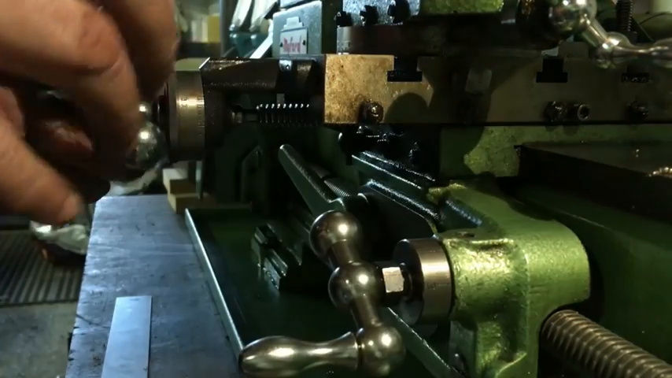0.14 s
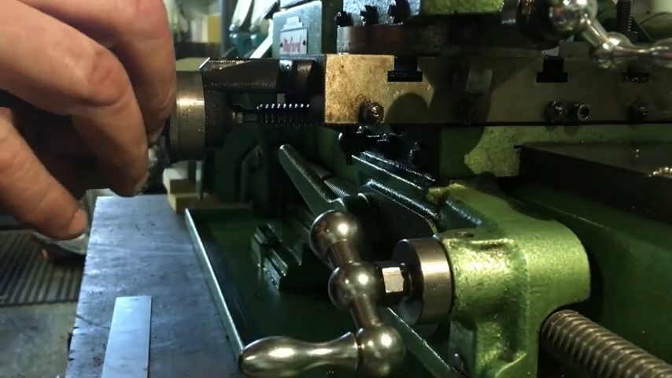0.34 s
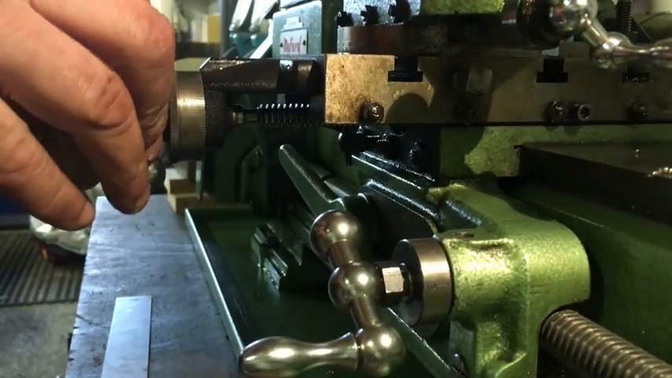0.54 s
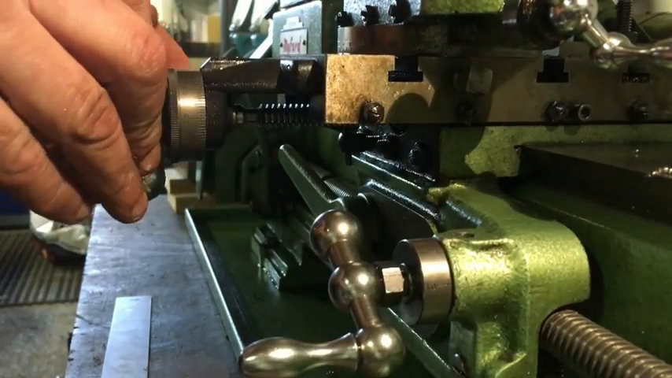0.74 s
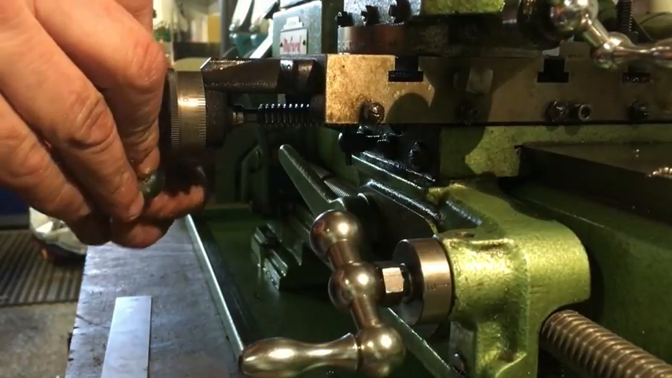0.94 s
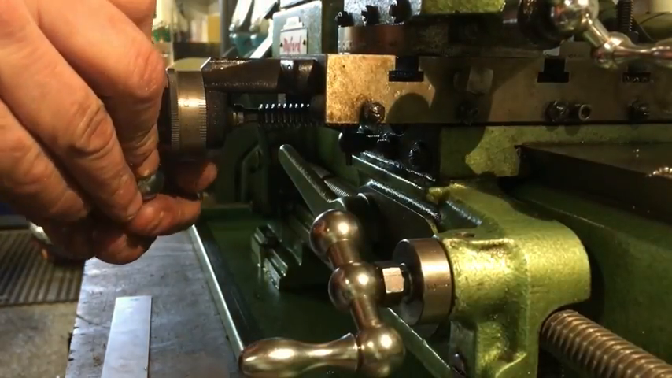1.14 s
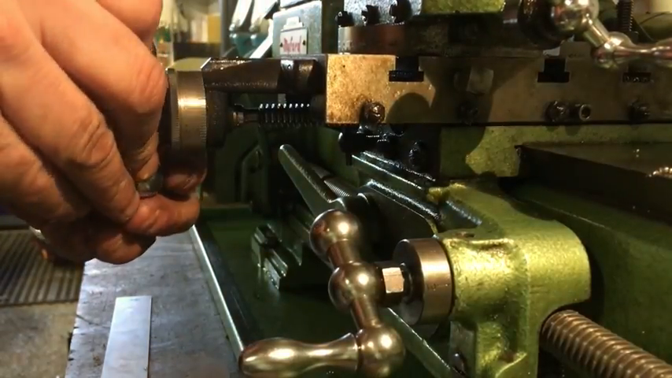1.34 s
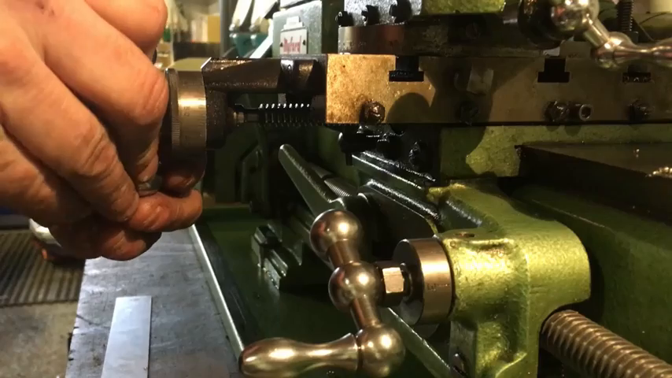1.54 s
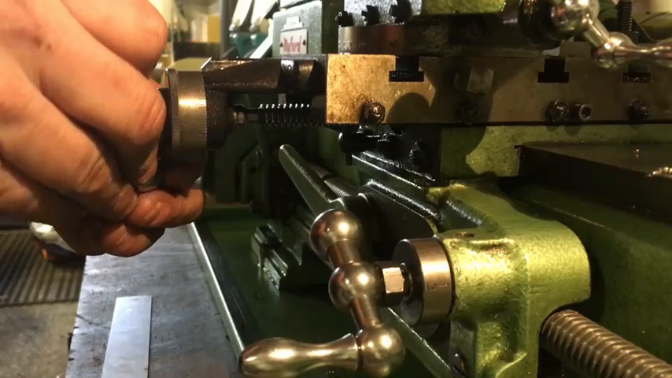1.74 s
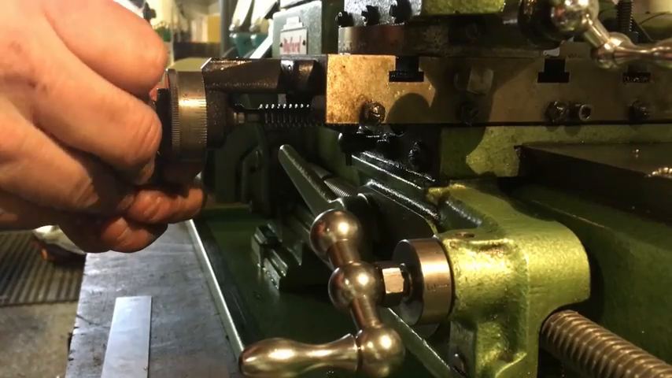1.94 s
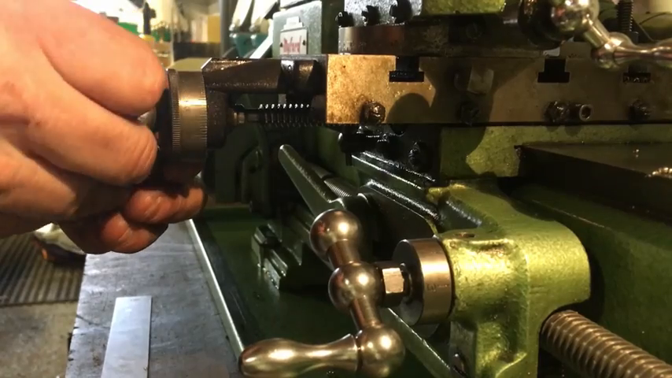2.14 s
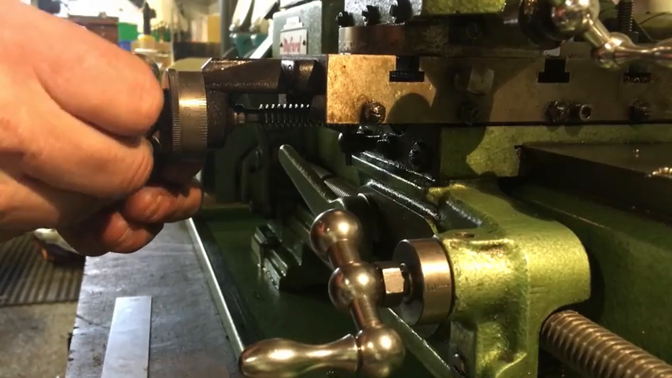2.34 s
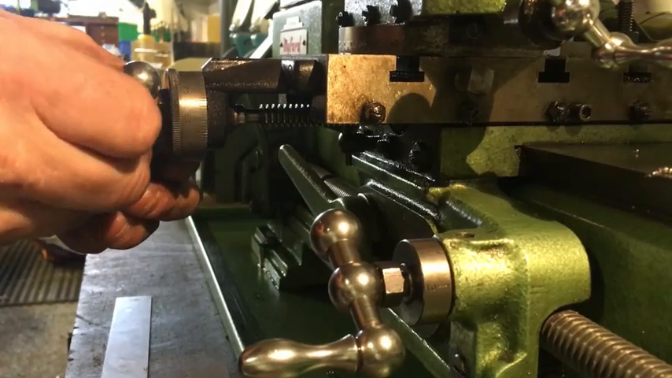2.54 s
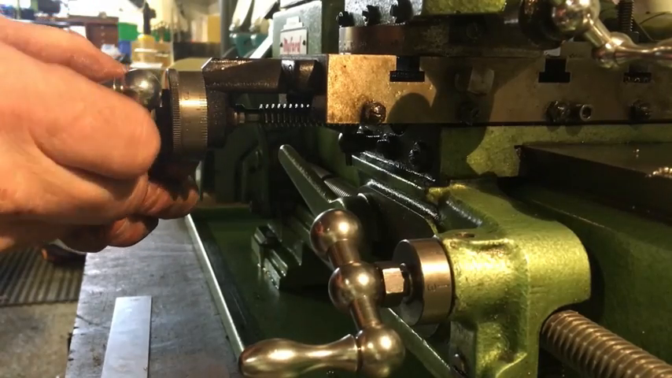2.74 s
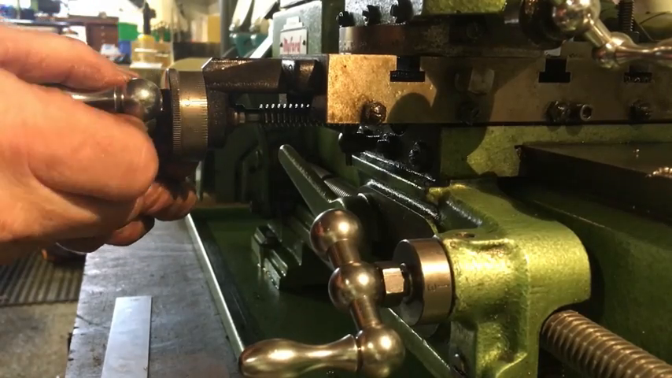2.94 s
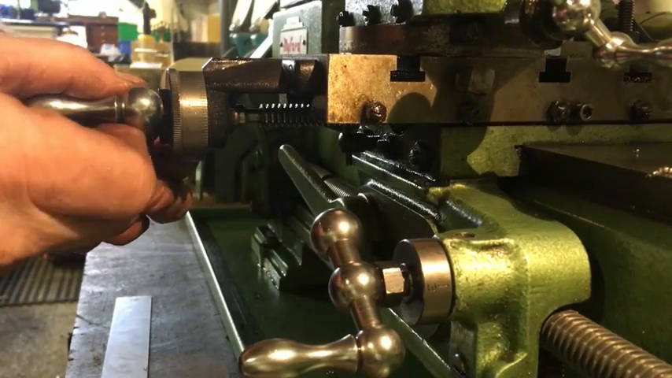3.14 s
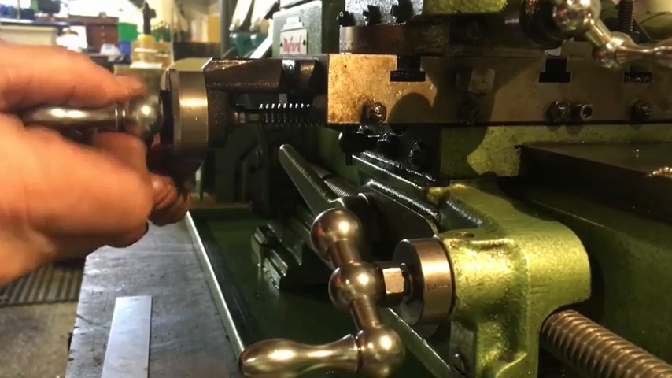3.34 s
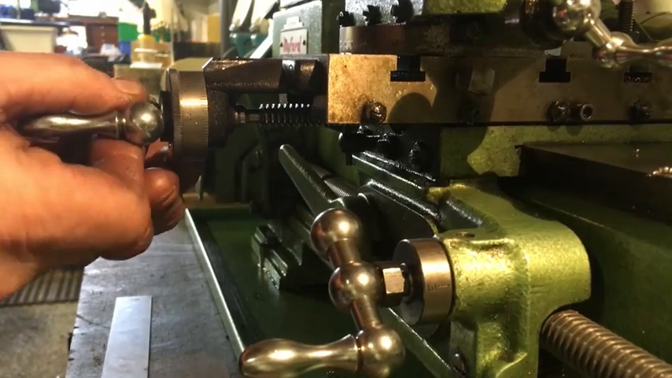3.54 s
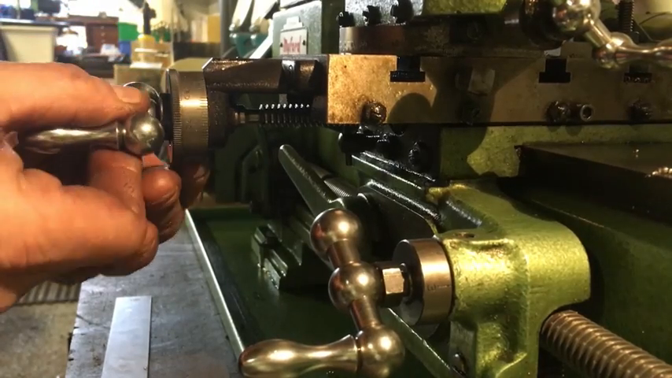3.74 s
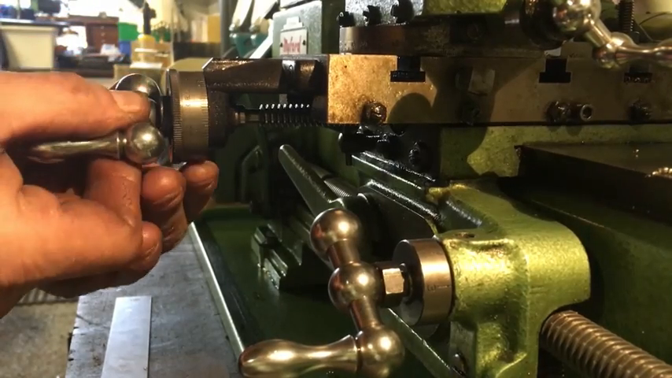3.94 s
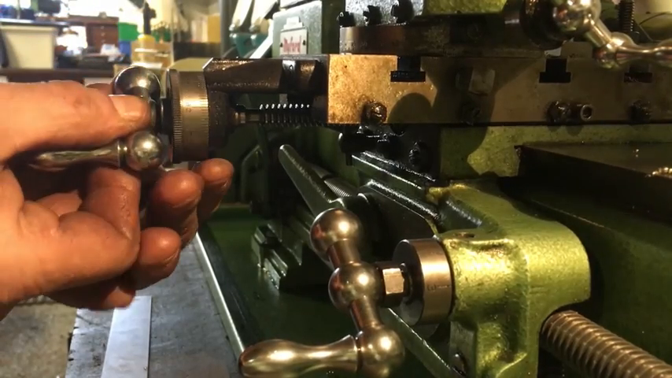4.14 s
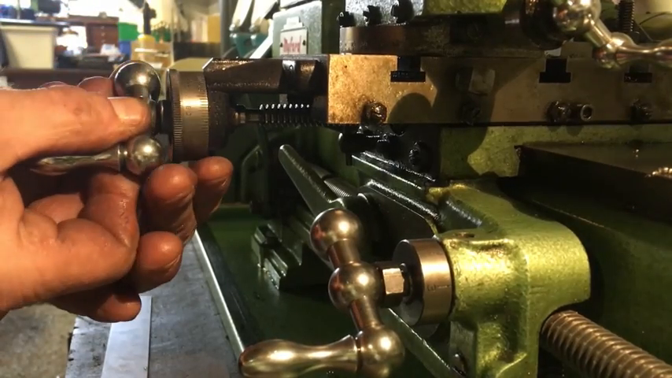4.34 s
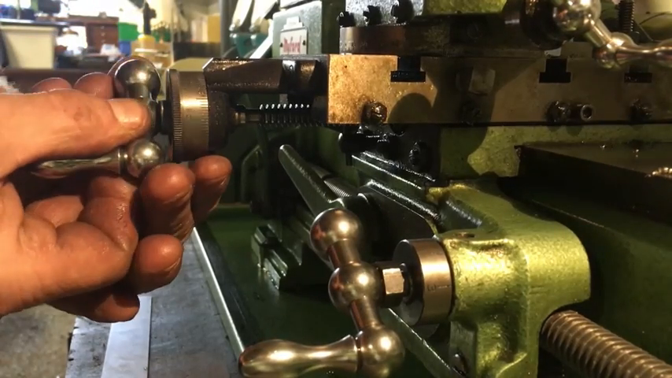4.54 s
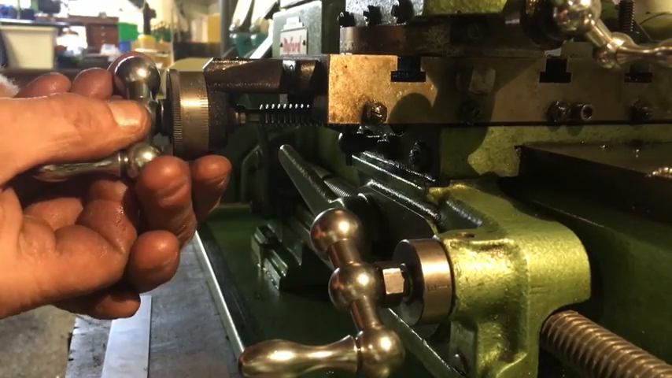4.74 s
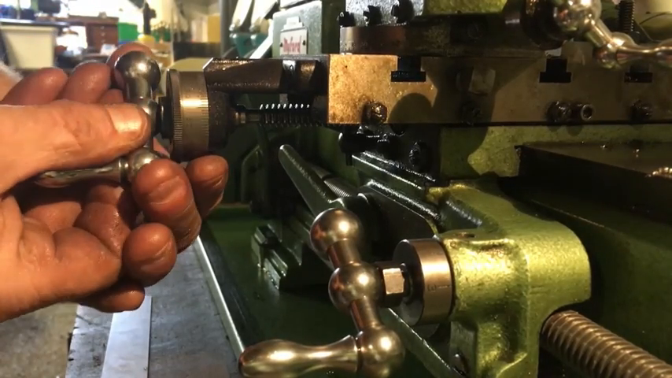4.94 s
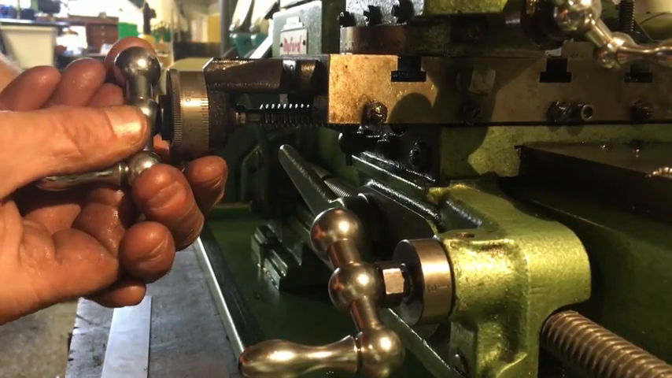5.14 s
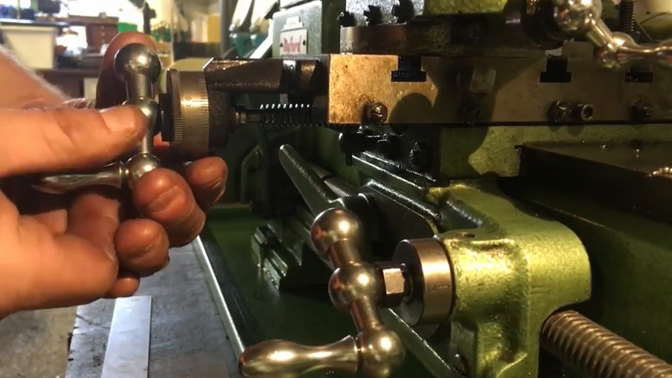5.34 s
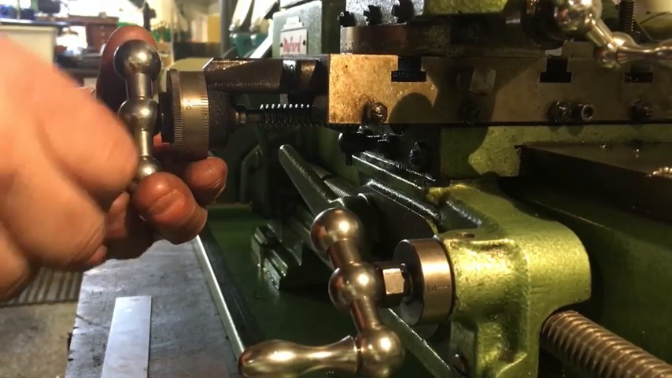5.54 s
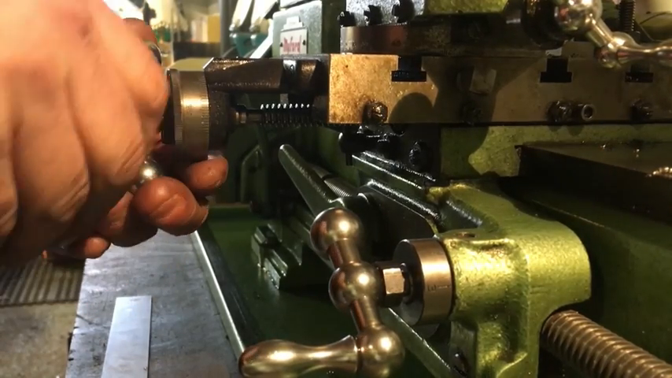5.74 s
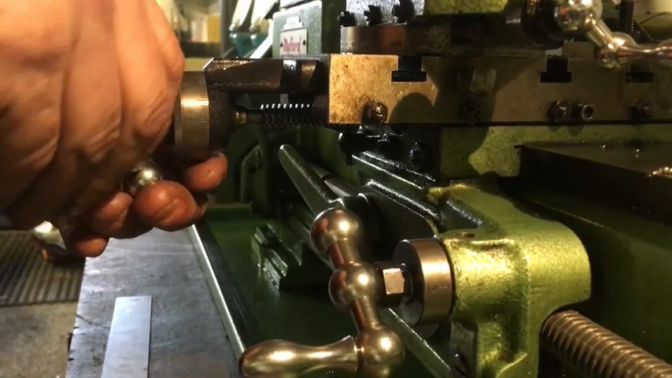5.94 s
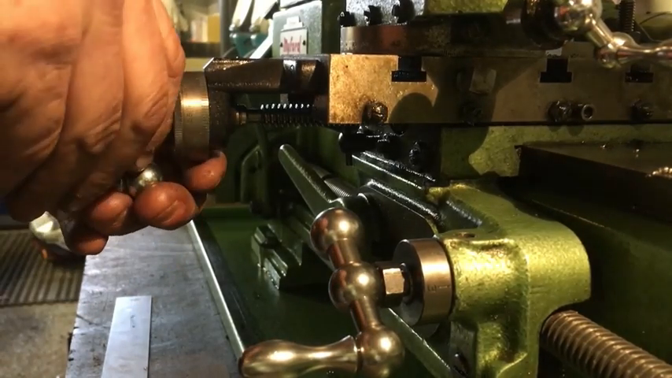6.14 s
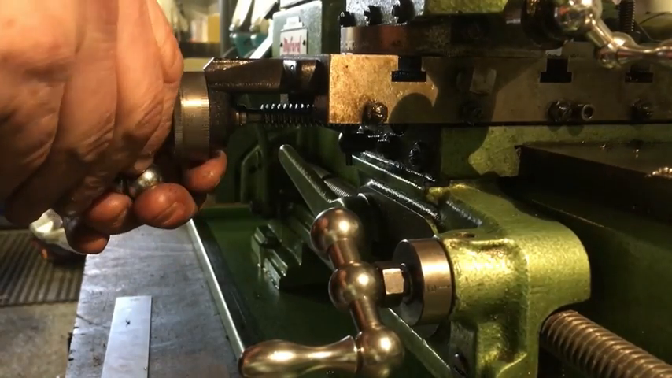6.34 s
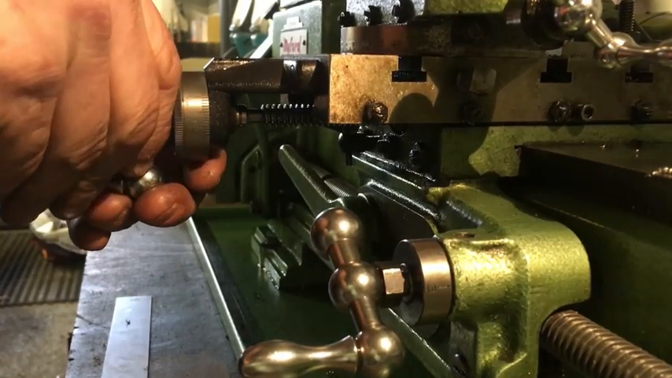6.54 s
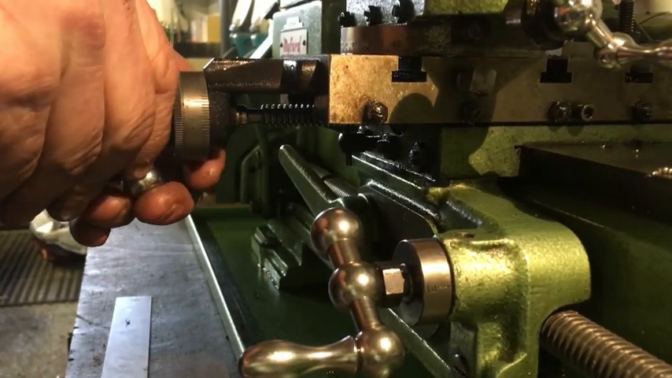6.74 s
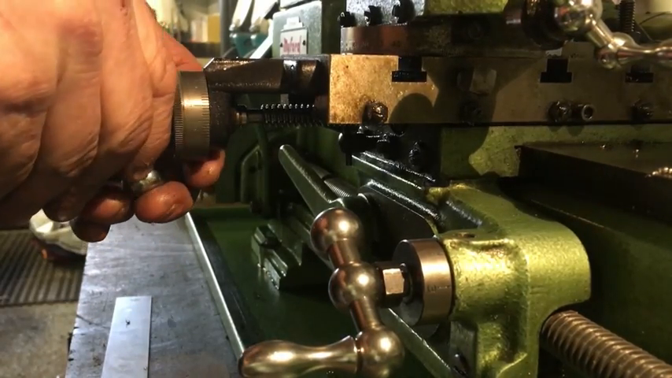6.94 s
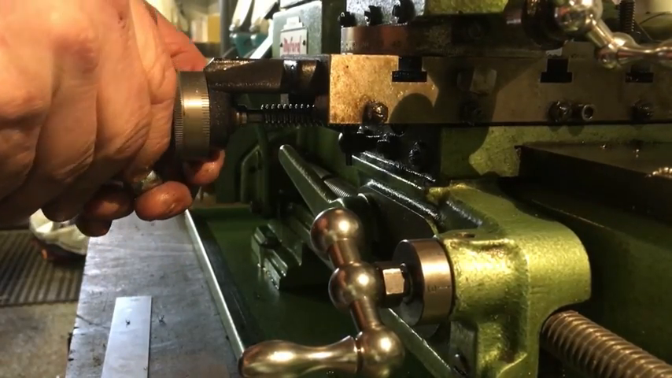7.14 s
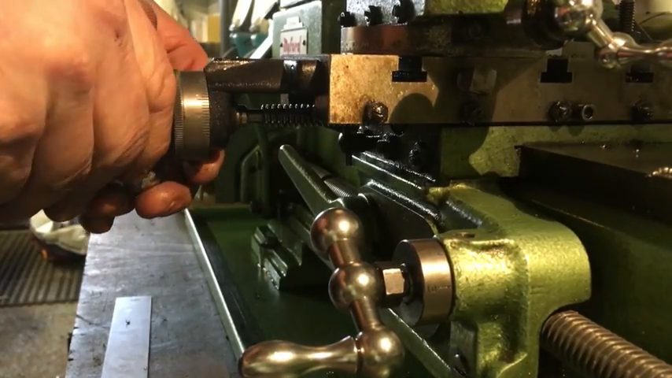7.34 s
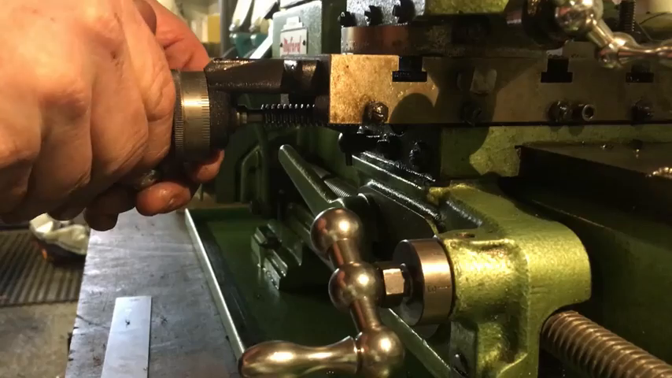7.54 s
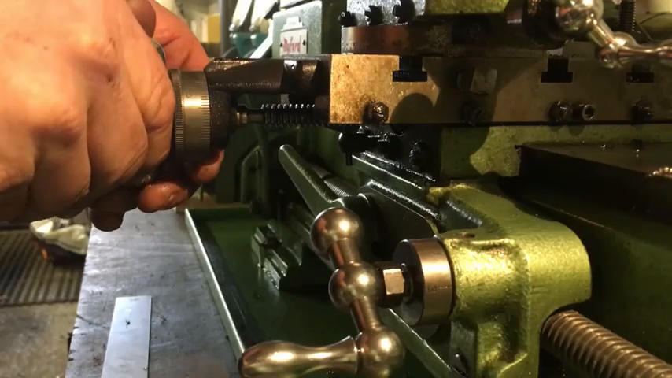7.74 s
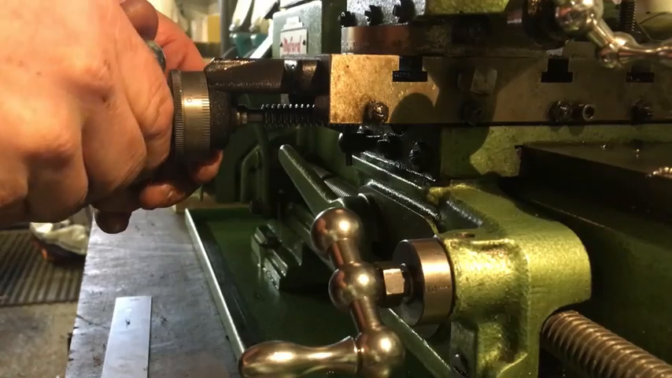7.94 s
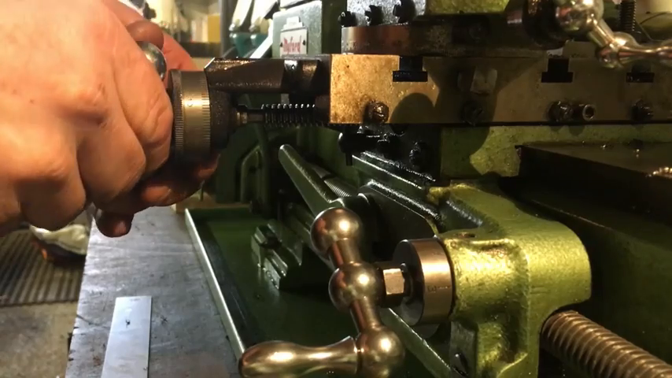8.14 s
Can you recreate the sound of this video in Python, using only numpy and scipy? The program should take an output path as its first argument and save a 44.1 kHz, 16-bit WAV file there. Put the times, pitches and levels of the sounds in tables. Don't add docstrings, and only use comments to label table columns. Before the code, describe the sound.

A small lathe idles softly, with faint ticks as the tool first touches. From under a second, bright metallic rasps come once per turn, about five a second, growing longer. After four seconds they join into an unbroken shrill, gritty ring with hiss, low bed rumble, chatter and snapping chips. Close microphone, small dry workshop.

```python
import sys
import numpy as np
from scipy import signal
from scipy.fft import rfft, irfft, next_fast_len
from scipy.io import wavfile
from scipy.ndimage import uniform_filter1d, map_coordinates

SR = 44100
rng = np.random.default_rng(int(sys.argv[2]) if len(sys.argv) > 2 else 0)


def makeup_ratio(level_db):
    decades = np.asarray(level_db, float) / 20
    return 10 ** decades


def store_pcm(level_fs):
    pcm = np.round(np.clip(level_fs, -1, 1) * 32767).astype(np.int16)
    wavfile.write(sys.argv[1], SR, np.atleast_2d(pcm).T)


N = 360738
FRAME = 941
UNBROKEN_S = 4.159

# start_s, length_s, ring_in_db, ring_out_db, pitch_in_hz
CONTACTS = [(0.732, 0.028, -22, -32.5, 6700), (0.929, 0.049, -37, -23, 5970), (1.143, 0.06, -31, -29, 6300),
            (1.356, 0.068, -28.5, -29.5, 6120), (1.569, 0.072, -27, -31.5, 6160),
            (1.78, 0.078, -28, -28, 6200), (1.987, 0.097, -32, -27.5, 6100), (2.207, 0.097, -31, -29, 6000),
            (2.422, .11, -30, -31, 6200), (2.634, 0.12, -30.5, -29, 6300), (2.854, 0.12, -33.5, -29, 6380),
            (3.063, 0.14, -33, -31, 6200), (3.283, 0.14, -31.5, -31, 6330), (3.497, 0.16, -34, -31, 6260),
            (3.717, 0.17, -34, -32, 6400), (3.928, 0.19, -34, -33.5, 6400)]
# start_s, ring_level_db, ring_pitch_hz
FEED = [(4.17, -32.5, 6570), (4.45, -31.5, 6650), (4.75, -31, 6750), (5.0, -30.5, 6580), (5.3, -31, 6700),
        (5.6, -31, 6700), (5.9, -32, 6400), (6.3, -31.5, 6450), (6.7, -31, 6540), (7.2, -31.5, 6500),
        (7.7, -32, 6550), (8.18, -31.5, 6430)]
# pitch_hz, width_hz, level_db
BED = [(200, 41.4, -8), (245, 20.5, -2.5), (321.7, 31.2, -2), (353.6, 28, -1.5), (390, 25, -1),
       (483, 51, -10), (560, 84.5, -12)]


def cut():
    # pitch_hz, width_hz, level_db
    holder = [(5350, 45, -3), (5220, 58, -3), (5560, 47, -1.5), (5886, 100, -3), (6120, 83, -3.5),
              (6330, 76, -4), (6560, 85, -3), (6860, 19, -7.5), (6716, 47, -6), (6800, 60, -2.5),
              (6980, 77, -7.5), (7500, 34, -4)]
    # pitch_hz, width_hz, level_db
    slide = [(1140, 36, 1.5), (1601, 50, -5.5), (1852, 92, -7), (2042, 120, -10.5), (2443, 167, -8),
             (2712, 65, -1.5), (2877, 51, -1), (3314, 96, -6.5), (3523, 100, -5), (3880, 170, -4),
             (4396, 28, -4), (4450, 25, -8), (4650, 43, -5), (7760, 110, -11), (8240, 230, -6.5),
             (8540, 59, -3.5), (8980, 120, -4.5), (9200, 70, 1), (9160, 59, 1.5), (9470, 160, -2),
             (10090, 263, -3.5), (12000, 210, -5.5), (12540, 110, -8.5), (13150, 200, -14.5),
             (15000, 350, -16.5), (15500, 250, -13)]
    # pitch_hz, level_db (per Hz)
    chip = [(290, -21), (500, -12), (917, -4.5), (1160, -9.5), (1350, -16.5), (2790, -9.5), (3090, -8),
            (3830, -14.5), (4970, -6.5), (6730, -1.5), (12300, -11), (14100, -14.5), (15800, -23)]
    t = np.arange(N) / SR
    ring_gain, bed_gain, hiss_gain, centre_hz = contact()
    force = tearing(grain_db=1.5, rate=260)

    shank = modes([(6060, 10000, 0)])
    each = filtered(force, lambda f: np.array([modes([m])(f) for m in holder]) * shank(f))
    reach_hz = np.interp(t, [.9, 2.5], [380, 750])
    ring = np.zeros(N)
    for k, (hz, _, _) in enumerate(holder):
        favour_db = np.maximum(-4 * ((hz - centre_hz) / reach_hz) ** 2, -14) + 1.95 * wobble(14)
        ring += (-1) ** k * makeup_ratio(favour_db) * each[k]
    ring = ring / np.sqrt(np.abs(uniform_filter1d(ring ** 2, size=8000)))

    bed_low_cut = lambda f: (f / 170) ** 4 / (1 + (f / 170) ** 4)
    bed = unit(filtered(tearing(grain_db=2, rate=70), lambda f: modes(BED)(f) * bed_low_cut(f)))

    grit = tearing(grain_db=2.0, rate=300) * makeup_ratio(1.34 * wobble(18))
    hiss = unit(filtered(grit, modes(slide)))
    hiss = hiss + makeup_ratio(1.0) * unit(filtered(force, lambda f: makeup_ratio(along(chip, f))))
    load_db = np.interp(t, [.8, 3.5, 8], [-3, -.6, 1.5])
    below_4k = signal.butter(2, 4000, fs=SR, output="sos")
    hiss = hiss + (makeup_ratio(load_db) - 1) * signal.sosfilt(below_4k, hiss)

    mix = makeup_ratio(-1.28) * ring_gain * ring + makeup_ratio(0.14) * bed_gain * bed + makeup_ratio(0.77) * hiss_gain * hiss
    return filtered(mix, nulls)


def contact():
    # start_s, level_db
    surges = [(4.855, 6.5), (5.07, 4), (5.26, 4), (5.49, 3), (5.69, 2.5), (6.115, 1), (6.5, 1), (6.655, 3),
              (7.09, 0), (7.38, 4), (7.55, 5.5), (7.73, 0), (8.07, 1.5)]
    # start_s, length_s, hiss_level_db
    trails = [
        (2.33, 0.052, -50),
        (2.99, 0.078, -49.5),
        (4.123, .05, -42),
    ]
    silent_db = -60
    attack_s, settle_s = 0.017, 0.0044
    surge_rise_s, surge_fall_s = .006, 0.053
    bed_rings_s = 0.039
    bed_lag_s, hiss_lead_s = 0.003, 0.0033
    graze_s = .056
    fade = np.array([[820], [230], [700]])
    shift_s = np.array([[0], [-bed_lag_s], [hiss_lead_s]])
    t = np.arange(N) / SR

    s, feed_db, feed_hz = np.transpose(FEED)
    depth_db = np.interp(t, s, feed_db) - 0.3
    centre_hz = np.interp(t, s, feed_hz)
    for s, db in surges:
        swell = np.minimum(1 + (t - s) / surge_rise_s, 1 - (t - s) / surge_fall_s)
        depth_db = depth_db + db * np.clip(swell, 0, 1)
    swing_db = depth_db - depth_db[t > UNBROKEN_S].mean()
    rise = np.clip((t - UNBROKEN_S - settle_s) / attack_s + 1, 0, 1)
    full_db = np.array([depth_db, -34 + 0.58 * swing_db, -38 + 0.54 * swing_db])
    gains = (rise > 0) * makeup_ratio(silent_db + rise * (full_db - silent_db))

    for bite, length, in_db, out_db, hz in CONTACTS:
        first = round((bite - attack_s - hiss_lead_s) * SR)
        span = slice(first, round((bite + length + 2 * bed_rings_s) * SR))
        u = t[span] - bite
        through = np.clip(u / length, 0, 1)
        rise = np.clip((u - settle_s + shift_s) / attack_s + 1, 0, 1)
        after = np.maximum(u - length, 0)
        going_in, coming_out = np.array([[in_db], [-34.5], [-39]]), np.array([[out_db], [-34.5], [-39.5]])
        held_db = going_in * (1 - through) + coming_out * through
        level = makeup_ratio(silent_db + rise * (held_db - silent_db) - fade * after)
        damped = np.clip(2 - after / bed_rings_s, 0, 1) ** 2
        gains[:, span] = np.maximum(gains[:, span], level * (rise > 0) * damped)
        hz_per_db = 19 if length < graze_s else -45
        bent_hz = hz + hz_per_db * (held_db[0] - in_db)
        centre_hz[span] = np.where(t[span] < UNBROKEN_S, bent_hz, centre_hz[span])

    for s, length, db in trails:
        span = slice(round(s * SR), round((s + length) * SR))
        scrape = makeup_ratio(db) * np.hanning(span.stop - span.start) ** .25
        gains[2, span] = np.maximum(gains[2, span], scrape)
    return *gains, centre_hz


def tearing(grain_db, rate):
    return unit(rng.standard_normal(N) * makeup_ratio(grain_db * wobble(rate)))


def nulls(f):
    # pitch_hz, width_hz, gain_db
    notches = [(149, 75, -11.5), (913, 60, -4.5), (1410, 160, 1), (1694, 68, -10), (2240, 56, -4),
               (3040, 280, -9.5), (4900, 210, -6.5), (7500, 130, 3), (7990, 120, -18), (8580, 120, -15),
               (11300, 360, -4), (14100, 2300, -5)]
    response = 1
    for c, w, db in notches:
        response = response * (c * c - f * f + 1j * f * w * makeup_ratio(db)) / (c * c - f * f + 1j * f * w)
    return response


def chatter():
    # start_s, peak_level_db, pitch_hz
    rattles = [(0.9503, -8, 6020), (1.6073, -7, 6060), (2.0518, -18, 6060), (2.0657, -10, 5980),
               (2.4603, -12, 5960), (3.9983, -12.5, 6000), (4.8529, -25, 6850), (4.9956, -26, 6870),
               (5.0734, -21, 6260), (5.4765, -19.5, 6570), (5.5234, -19, 6660), (5.5418, -12.5, 5680),
               (5.5678, -13, 6550), (5.679, -12.5, 6600), (5.7633, -15, 6860), (5.918, -14, 6330),
               (5.9948, -13.5, 6140), (6.1195, -9, 6100), (6.2158, -16, 6850), (6.5046, -15.5, 6470),
               (6.6583, -12.5, 6210), (7.0319, -14, 6470), (7.0968, -18, 6600), (7.1527, -16, 6200),
               (7.3298, -18, 5970), (7.3821, -23, 6040), (7.6231, -21, 6800), (7.7309, -14, 6120),
               (7.9638, -19, 5930), (8.0741, -17, 6500)]
    # start_s, peak_level_db, pitch_hz
    grazes = [
        (0.5357, -34, 6800),
        (0.5454, -38, 6010),
        (2.3454, -37, 5960),
    ]
    # start_s, peak_level_db, centre_hz
    snaps = [
        (3.9982, -41, 2900),
        (5.0736, -21, 4450),
        (5.2594, -24, 3880),
        (5.497, -29, 3320),
        (5.6965, -21.5, 3880),
        (6.4372, -21, 2700),
        (7.4115, -19, 3850),
        (7.632, -17, 3830),
        (7.9637, -20, 4670),
    ]
    # start_s, peak_level_db, pitch_hz
    thuds = [(0.755, -25, 520), (0.97, -19.5, 363), (1.19, -22, 495), (1.21, -23.5, 245), (1.4, -17, 390),
             (2.221, -21.5, 399), (2.712, -21, 369), (3.599, -19, 336), (4.36, -15, 236), (4.884, -15, 300),
             (5.379, -16.5, 320), (5.624, -16, 345)]
    springs, breaks, jolts = bites()
    tip = bursts(rattles + grazes + springs, t60=0.017, hold=0.0022, spread=0.071, count=5, main=1.52,
                 trim_db=-11.0)
    chips = bursts(snaps + breaks, t60=0.029, hold=.002, spread=.45, count=30, main=0, trim_db=-8.5)
    bed = bursts(thuds + jolts, t60=0.11, hold=0.0044, spread=0.36, count=2, main=0.9, trim_db=-12.0)
    return tip + chips + bed


def bites():
    light_until_s, snaps_from_s = 1.5, 2.1
    jolt_lag_s = 0.00612
    rows = [(s, db, hz) for s, _, db, _, hz in CONTACTS] + [(UNBROKEN_S, *FEED[0][1:])]
    tip, chips, bed = [], [], []
    for (s, db, hz), luck in zip(rows, rng.uniform(-1, 1, (len(rows), 4))):
        tip.append((s, db + 4 + 3 * luck[0], hz + 150))
        mode = 1 if s < light_until_s else int(3.5 + 1.49 * luck[2])
        bed.append((s + jolt_lag_s, -24 + 1.5 * luck[1], BED[mode][0]))
        if s > snaps_from_s:
            chips.append((s, -43 + 5.1 * luck[0], 3450 * (1 + 0.21 * luck[3])))
    return tip, chips, bed


def bursts(events, t60, hold, spread, count, main, trim_db):
    out, t = np.zeros(N + SR), np.arange(SR // 12) / SR
    chance = rng.uniform(-1.04, 1, (len(events), 2, count, 1))
    swell = (1 - np.exp(-4 * t / hold)) * makeup_ratio(-60 * np.maximum(t - hold, 0) / t60)
    for (s, db, hz), (off, turn) in zip(events, chance):
        beside = np.sin(2 * np.pi * hz * (1 + spread * off) * t + np.pi * turn).sum(axis=0) / np.sqrt(count)
        tone = main * np.sin(2 * np.pi * hz * t)
        out[round(s * SR):][:len(t)] += makeup_ratio(db + trim_db) * swell * (tone + beside)
    return out[:N]


def swarf():
    # time_s, level_db, pitch_hz
    drag = [
        (2.955, -75, 12300),
        (2.975, -54, 12200),
        (3.02, -54, 12000),
        (3.05, -56, 12000),
        (3.065, -75, 12000),
    ]
    s, db, hz = np.transpose(drag)
    t = np.arange(N) / SR
    pitch_hz = np.interp(t, s, hz) + 350 * wobble(900)
    level_db = np.interp(t, s, db, -200, -200) + 4 * wobble(250)
    return makeup_ratio(level_db + 5) * np.sin(2 * np.pi * np.cumsum(pitch_hz) / SR)


def idle():
    # pitch_hz, width_hz, level_db
    gears = [(105, 42, 0.5), (395, 28, 0.5), (565, 33, -1.5), (1840, 18, -42), (2125, 14, -6.5),
             (3595, 54, -9), (5930, 31, 2), (5810, 55, -9), (6850, 210, -9), (7400, 96, -2),
             (8000, 64, -32), (8350, 26, -19), (8960, 240, -14), (9610, 140, -10.5), (9460, 140, -16),
             (11960, 60, -11)]
    # pitch_hz, level_db (per Hz)
    motor = [(13, -45), (22, -5), (87, -4.5), (276, -12), (385, -3), (441, -14), (565, -8.5), (649, -15.5),
             (1400, -19), (1750, -26.5), (2060, -18), (4970, -26.5), (5860, -13), (7300, -18.5),
             (15800, -36.5)]
    # pitch_hz, level_db (peak)
    lines = [
        (1997, -64.5),
        (2175, -67.5),
        (8000, -66),
        (7450, -72),
    ]
    t = np.arange(N) / SR
    frame = unit(filtered(tearing(grain_db=3.5, rate=60), modes(gears)))
    air = unit(filtered(rng.standard_normal(N), lambda f: makeup_ratio(along(motor, f))))
    whine = np.zeros(N)
    for hz, db in lines:
        whine += makeup_ratio(db + 0.65 * wobble(8.5)) * np.sin(2 * np.pi * hz * t + 1.6 * wobble(9))
    return makeup_ratio(-48.5 + 0.27 * wobble(2.3)) * frame + makeup_ratio(-46.5) * air + whine


def shop(x):
    # pitch_hz, t60_s
    decay = [
        (200, 0.22),
        (2000, 0.091),
        (10000, 0.038),
    ]
    hz, t, z = signal.stft(rng.standard_normal(SR // 2), SR, nperseg=256)
    tail = signal.istft(z * makeup_ratio(-60 * t / along(decay, hz)[:, None]), SR, nperseg=256)[1]
    late = np.pad(x, (300, 0))
    return signal.fftconvolve(late, tail / np.linalg.norm(tail))[:N]


def unit(x):
    return x / np.sqrt(np.mean(x ** 2) + 1e-20)


def along(points, hz):
    f, v = np.transpose(points)
    return np.interp(np.log(hz + 1), np.log(f + 1), v)


def wobble(rate):
    coarse = np.arange(0, N + 16, 16)
    knots = rng.standard_normal(int(N * rate / SR) + 4)
    return np.interp(np.arange(N), coarse, map_coordinates(knots, [coarse * rate / SR]))


def filtered(x, response):
    m = next_fast_len(N + SR // 8)
    return irfft(rfft(x, m) * response(np.fft.rfftfreq(m, 1 / SR)), m)[..., :N]


def modes(table):
    def response(f):
        return sum((-1) ** k * makeup_ratio(db) * 1j * f * w / (c * c - f * f + 1j * f * w)
                   for k, (c, w, db) in enumerate(table))
    return response


def scene():
    tool = cut() + chatter() + swarf()
    machine = filtered(idle(), lambda f: 1 - 0.46 * modes([(155, 50, 0)])(f))
    return (tool + makeup_ratio(-14.0) * shop(tool) + machine)[None]


def thin_briefly(x):
    dips = [.081, .337, .678, .763, .917, 1.214, 1.47, 2.962, 3.067, 3.174, 3.28, 3.322, 4.199, 5.479,
            6.375, 7.462]
    lost = .92
    x, window = x.copy(), np.hanning(FRAME) ** 0.47
    hz = np.fft.rfftfreq(FRAME, 1 / SR)
    for s in dips:
        a = round(s * SR) - FRAME // 2
        z = rfft(x[a:a + FRAME] * window)
        standing = np.abs(z) / uniform_filter1d(np.abs(z), size=60) ** 0.39
        weak = (standing < np.quantile(standing, lost)) & (hz > 900)
        x[a:a + FRAME] -= irfft(z * weak, FRAME)
    return x


def treble_gaps(x):
    # centre_s, half_length_s, extra_level_db
    pinched = [(2.045, .05, 7), (4.2, .25, 4), (3.01, .07, 10), (3.19, .035, 11), (4.55, .2, 3),
               (5.02, .06, 5), (5.8, .17, 7), (6.4, .25, 7), (7.05, .25, 7), (7.3, .2, 7), (8.05, .3, 3)]
    hz, t, z = signal.stft(x, SR, nperseg=2 * FRAME)
    power = np.abs(z) ** 2
    patch = uniform_filter1d(power, size=7, axis=0)
    whim = uniform_filter1d(rng.standard_normal(z.shape), size=9, axis=0)
    whim_db = 2.5 * unit(uniform_filter1d(whim, size=3, axis=1))
    extra_db = sum(db * np.clip(1 - np.abs(t - s) / half, 0, 1) for s, half, db in pinched)
    limit = power.mean(axis=0) * makeup_ratio(2 * (-23.5 + extra_db + whim_db))
    top_band = (hz > 12600) & (hz < 14800)
    z[(patch < limit) & top_band[:, None]] = 0
    return signal.istft(z, SR, nperseg=2 * FRAME)[1][:N]


def roll_off(x):
    return signal.sosfilt(signal.butter(12, 15930, fs=SR, output="sos"), x)


def record(dry):
    top_hz, low_hz = 15740, 38

    def low_cut(f):
        r = f / low_hz
        return ((1j * r) ** 2 / (1 + 1.2j * r - r ** 2)) ** 2

    mix = filtered(treble_gaps(thin_briefly(dry[0])), lambda f: (f < top_hz) * low_cut(f))
    return roll_off(mix[None])


dry = scene()
out = record(dry)
store_pcm(out)
```